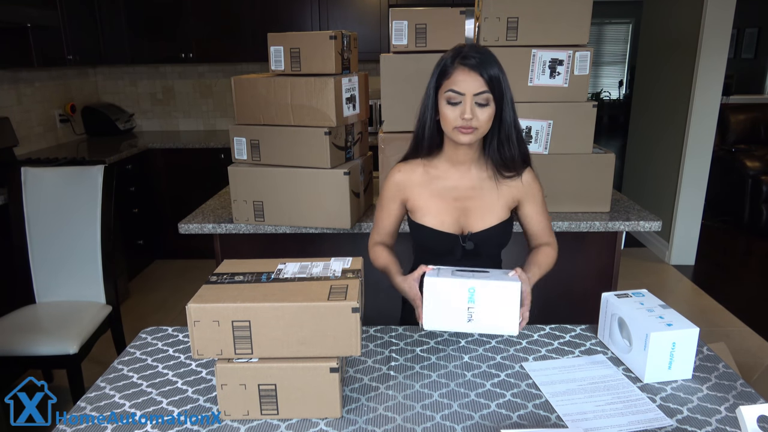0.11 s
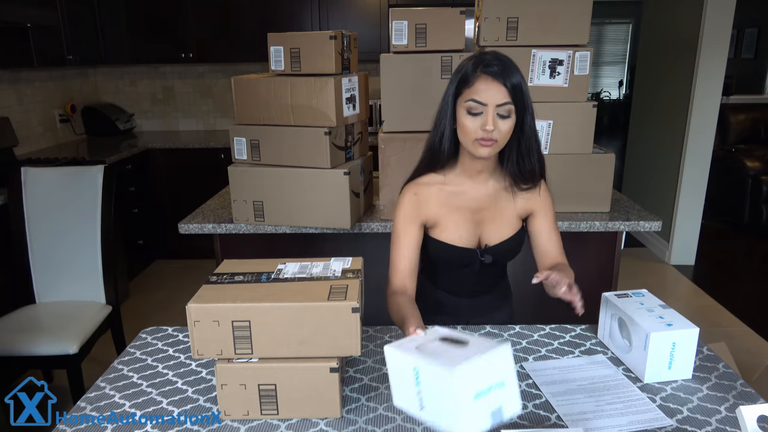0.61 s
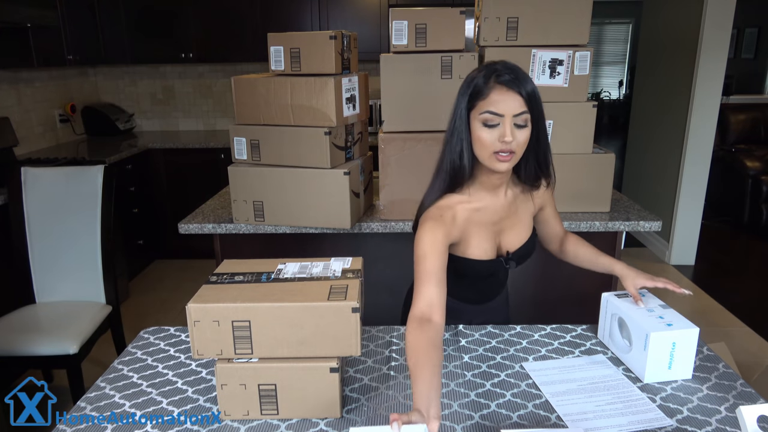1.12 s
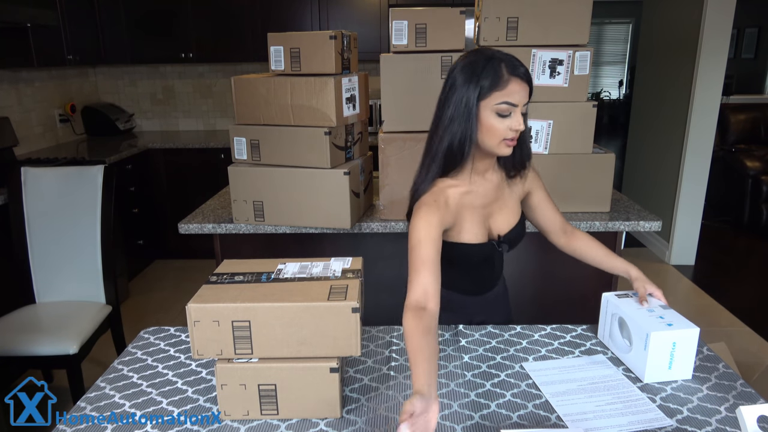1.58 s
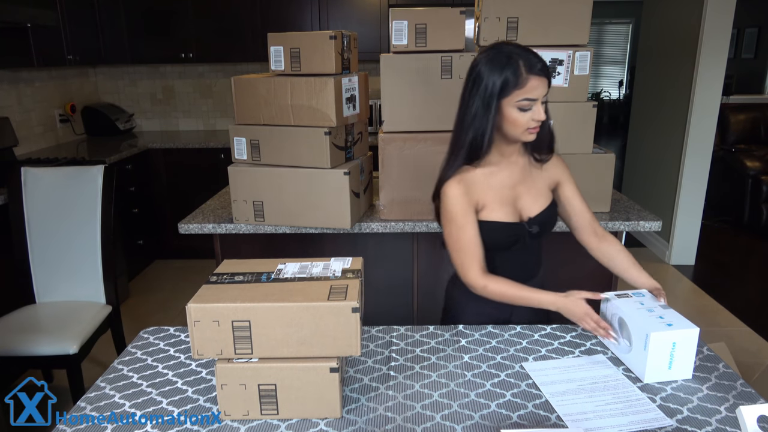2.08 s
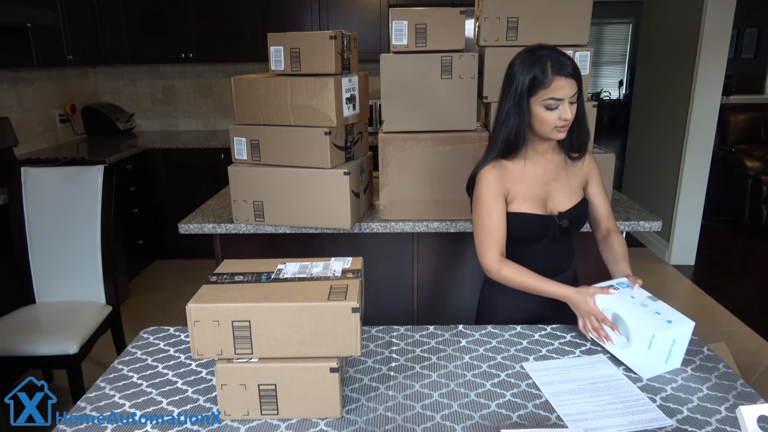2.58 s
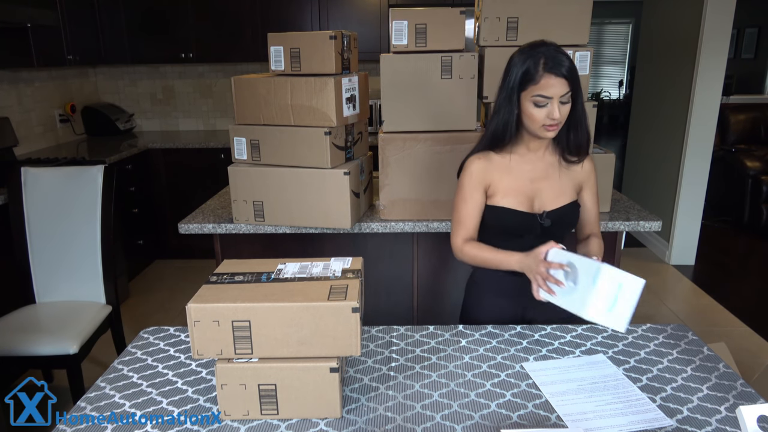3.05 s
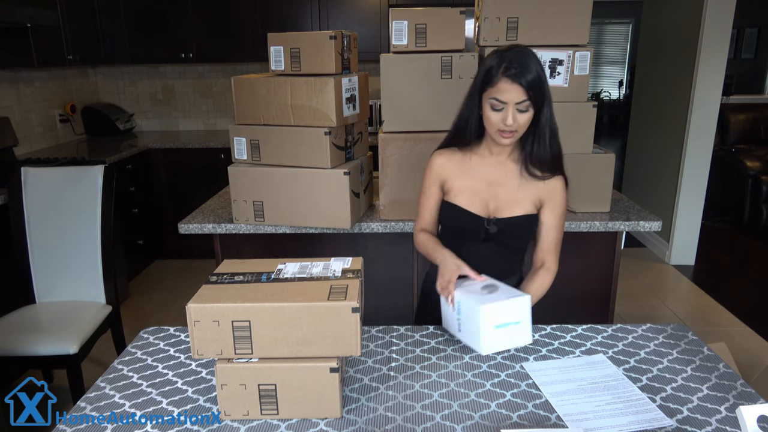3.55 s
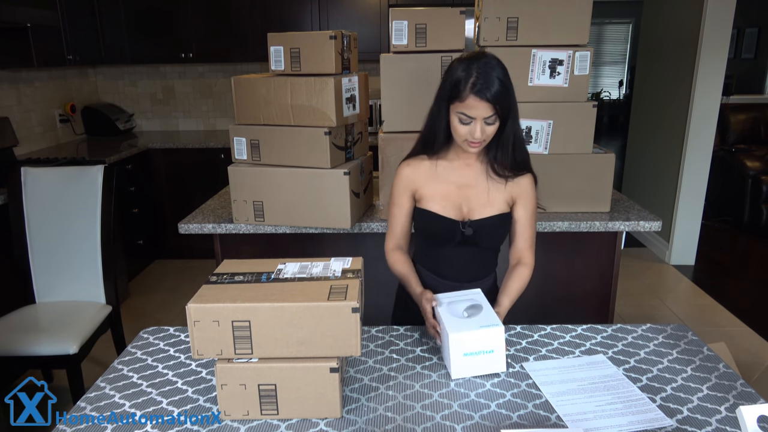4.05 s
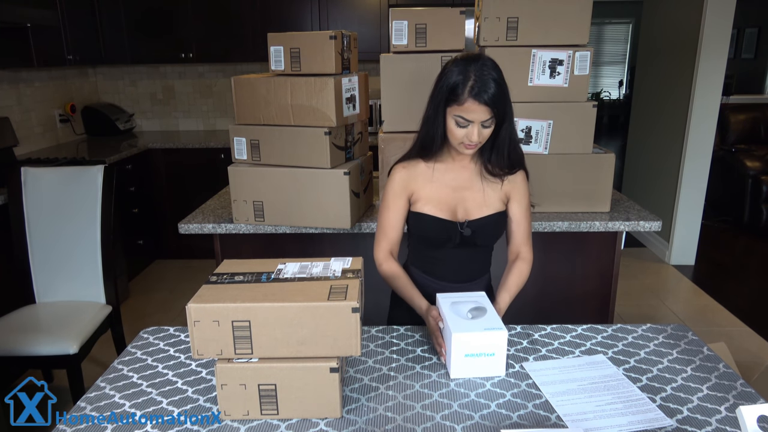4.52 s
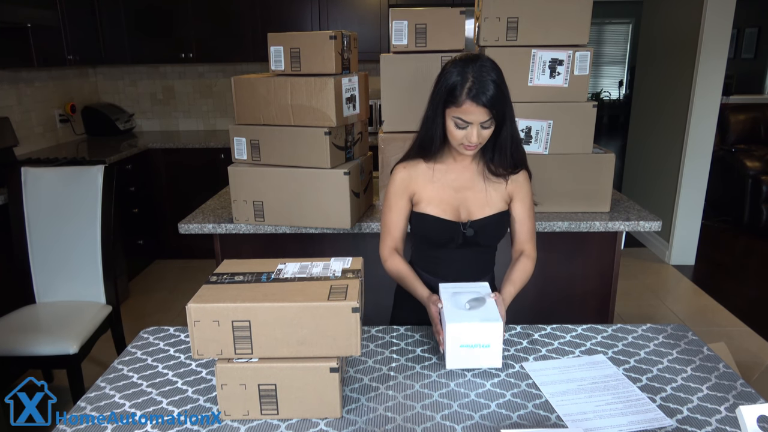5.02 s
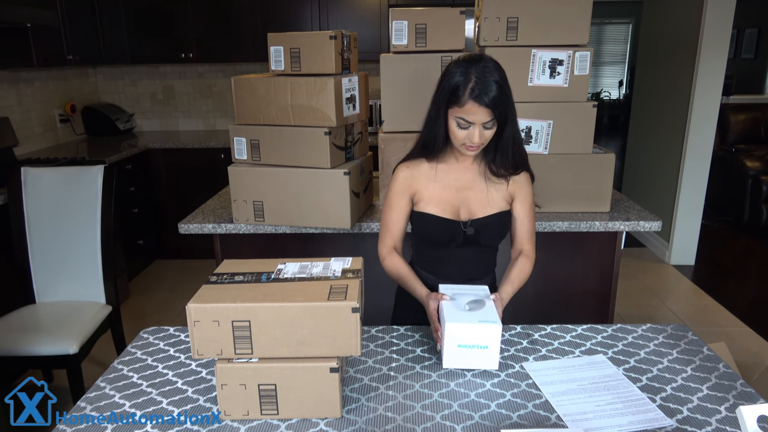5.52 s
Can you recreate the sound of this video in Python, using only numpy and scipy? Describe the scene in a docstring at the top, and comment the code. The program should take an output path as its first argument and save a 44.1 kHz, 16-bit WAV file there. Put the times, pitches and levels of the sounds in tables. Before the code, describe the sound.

Small cardboard boxes are slid, turned and set down on a cloth-covered table with hollow thumps, light ticks and soft rubbing in a furnished room.

```python
"""A brief rub and a low thump open a run of small cardboard boxes slid, turned and set down on a clothed table.
Landings are damped modes of table top, box and card walls, struck by a push and a rattle, with a swing of air.
Edges and nails tick as noise bursts, a small hard thing rings as sines, fingers and cloth rub as random slips.
A furnished room answers with decaying noise; the sound is nearly mono, close to overload on the hardest blows."""
import sys
import numpy as np
from scipy import signal
from scipy.fft import rfft, irfft
from scipy.io import wavfile

SR = 44100
rng = np.random.default_rng(int(sys.argv[2]) if len(sys.argv) > 2 else 0)


def pcm_store(signal):
    """Save signal as 16-bit PCM."""
    levels = np.round(np.clip(np.atleast_2d(signal), -1, 1) * 32767)
    wavfile.write(sys.argv[1], SR, levels.astype(np.int16).T)


def nominal_scale(level):
    """Amplitude ratio for a level in decibels (scalar or array-like)."""
    x = np.asarray(level, float) / 20
    return 10 ** x


N = 248283

# box landings and knocks; levels are relative within each layer:
# [t/s, air thump and box level/dB, table-top level/dB, card-wall level/dB, pitch f/Hz]
KNOCKS = [(0.003, -20, -26, -40, 79.5), (0.012, -22.5, -37, -24, 198), (0.142, -28, -39, -26.5, 82),
          (0.341, -39, -64, -30.5, 390), (0.371, -35, -54, -36, 457), (0.38, -22.5, -56, -42, 352),
          (0.384, -25.5, -57, -56, 455), (0.399, -37, -55, -37, 310), (0.4152, -19, -57, -30.5, 540),
          (0.419, -33.5, -54, -47, 540), (0.427, -48, -44, -37.5, 404), (0.709, -35, -45.5, -36.5, 325),
          (1.071, -9.5, -9.5, -28, 260), (1.179, -23.5, -37, -54, 133), (1.261, -29.5, -33, -34.5, 266),
          (1.324, -5.5, -9.5, -25, 256), (1.59, -6.5, -29, -14, 123), (1.594, -9, -32, -17.5, 350),
          (1.612, -4.5, -12, -24.5, 287), (1.801, -56, -33, -40, 41.4), (2.106, -31.5, -50, -43, 540),
          (2.239, -19, -56, -39, 176), (2.26, -33, -54, -66, 225), (2.412, -38, -62, -70, 163),
          (2.675, -22.5, -60, -29.5, 301), (2.845, -36, -62, -34.5, 430), (2.921, -21, -53, -54, 263),
          (2.964, -42, -55, -58, 303), (3.107, -39, -40, -37, 272), (3.114, -30.5, -40, -49, 276),
          (3.134, -39, -58.5, -37, 208), (3.259, -35.5, -40, -33.5, 420), (3.324, -34.5, -38, -39, 283),
          (3.511, -43.5, -39, -35.5, 78.6), (3.612, -47, -50, -48, 517), (3.728, -3.5, -10, -22.5, 169),
          (3.834, -4.5, -26, -8, 227), (3.864, -9, -14, -12, 460), (3.889, -10, -34, -14.5, 297),
          (4.1706, -2.5, -6.5, -17.5, 168), (4.423, -38.5, -35, -69, 41), (4.633, -48, -48, -57, 104),
          (4.687, -44, -41, -47, 270), (4.797, -53, -64, -44, 74.6), (4.844, -42.5, -42, -37, 340),
          (4.992, -38.5, -50, -43, 293), (5.075, -30.5, -67, -60, 180), (5.317, -55, -51, -40, 78),
          (5.457, -38, -56, -35, 227), (5.485, -35, -49, -42, 290), (5.592, -40, -49.5, -48, 297),
          (5.615, -51, -42, -33.5, 75)]
# resonances of each body, ring times before any damping: [f/Hz, relative level/dB, t60/s]
TABLE_MODES = [(37.46, -9.5, 1), (45.1, -2.5, 0.45), (75, -3, 0.15), (140, -7.5, 0.32)]
BOX_MODES = [(174.3, -6.5, 0.12), (199, 5, 0.063), (231.4, -0.5, 0.099), (277, 4.5, 0.41), (312, 5, 0.09),
             (350, 0, 0.14), (382, 18, 0.028), (448, -5.5, 0.097), (482, -1.5, 0.14), (540, -3.5, 0.12)]
WALL_MODES = [(562, -1, 0.051), (644, 2, 0.027), (678, -2, 0.065), (762, -2, 0.04), (813, 1, 0.023),
              (975, 3.5, 0.016), (1137, 8.5, 0.0098), (1212, 2.5, 0.013), (1419, -10.5, 0.025),
              (1580, -8, 0.0065), (1960, -27.5, 0.0092), (2340, -20.5, 0.0062), (2900, -29, 0.0074)]


def rms_one(x):
    """Scale to unit rms."""
    return x / np.sqrt(np.mean(x ** 2) + 1e-20)


def at_hz(points, hz):
    """Read a table on a log-frequency axis."""
    table_hz, values = np.transpose(points)
    return np.interp(np.log(hz), np.log(table_hz), values)


def in_time(rows):
    """Join the curve rows by straight lines."""
    s, *columns = np.transpose(rows)
    return [np.interp(np.arange(N) / SR, s, c) for c in columns]


def band(x, low_hz, high_hz):
    """Band-pass."""
    return signal.sosfilt(signal.butter(2, [low_hz, high_hz], "band", fs=SR, output="sos"), x)


def ring(x, hz, t60):
    """A two-pole resonator: a unit click sets a dying sine of starting height 1 ringing."""
    r = nominal_scale(-60 / (max(t60, .002) * SR))
    w = 2 * np.pi * hz / SR
    return signal.lfilter([0, np.sin(w)], [1, -2 * r * np.cos(w), r * r], x + 1e-18)


def drift(rate):
    """Slow wander: random points of spread 1, rate of them per second, joined by straight lines."""
    steps = rng.standard_normal(int(N / SR * 400))
    return np.interp(np.arange(N) / SR * rate, np.arange(len(steps)), steps)


def coloured(x, spectrum):
    """Shape a noise by a spectrum; rms 1."""
    hz = np.maximum(np.arange(N // 2 + 1) * SR / N, 1)
    return rms_one(irfft(rfft(x) * nominal_scale(at_hz(spectrum, hz)), N))


def room_tone():
    """The steady bed of the room: noise shaped by a fixed spectrum."""
    # colour of the bed: [f/Hz, relative level/dB]
    tone_spectrum = [(15, -23), (25, -6.5), (49, 11), (167, -24.5), (271, -8), (543, -20), (673, -1.5),
                     (952, -26.5), (6900, -28.5), (12100, -30.5), (15000, -59)]
    return nominal_scale(-60.5) * coloured(rng.standard_normal(N), tone_spectrum)


def grains(per_s, spread_db):
    """Fibres catch and let go: random slips of uneven size."""
    sizes = nominal_scale(spread_db * np.minimum(rng.exponential(size=N), 3.5)) * rng.standard_normal(N)
    return sizes * (rng.random(N) < per_s / SR)


def strokes():
    """Each stroke of skin or cloth along the card swells and fades; gains of hiss, air and scrape."""
    # [start t/s, length/s, fine hiss level/dB, top air level/dB, scrape in the card level/dB]
    stroke_rows = [(0.0, 0.058, -52.5, -63, -75), (0.11, 0.063, -81, -82, -41.5),
                   (0.362, 0.061, -44, -67.5, -39.5), (1.129, 0.15, -88, -89, -57),
                   (1.77, 0.27, -57.5, -72, -78), (2.294, 0.12, -79, -87.5, -50.5),
                   (2.485, 0.13, -69, -80, -41), (2.549, 0.11, -94, -73, -70), (2.679, 0.12, -90, -69, -56),
                   (3.191, 0.25, -54.5, -61, -53), (3.586, 0.079, -61, -64, -45),
                   (3.645, 0.35, -56, -60.5, -43), (3.82, 0.17, -56, -74, -27),
                   (3.877, 0.14, -58, -71, -50), (3.928, 0.24, -55, -81, -38),
                   (4.081, 0.19, -54, -66.5, -56.5), (4.177, 0.15, -66, -74.5, -71),
                   (4.204, 0.19, -55.5, -71, -77), (4.342, 0.26, -59.5, -69, -80),
                   (4.799, 0.093, -81, -69.5, -88), (4.909, 0.14, -59, -69, -61.5),
                   (5.045, 0.13, -57, -67.5, -54.5), (5.208, 0.12, -59, -76, -72),
                   (5.436, 0.14, -53.5, -61.5, -73), (5.571, 0.084, -56, -67, -60)]
    rise_share, edge_drop_db = 0.27, 27.5   # share of the length spent swelling; drop at both ends
    t, gains = np.arange(N) / SR, np.zeros((3, N))
    for s, length, *levels_db in stroke_rows:
        top = s + rise_share * length
        away = np.where(t < top, (top - t) / (top - s), (t - top) / (s + length - top))
        swell = nominal_scale(-edge_drop_db * np.minimum(away, 4) ** 2)
        gains += nominal_scale(np.array(levels_db))[:, None] * swell
    return gains


def shaking(column, offset_db, top_s):
    """Gain of the loose shaking that swells for top_s and dies after every blow."""
    blows = np.zeros(N)
    for row in KNOCKS:
        blows[round(row[0] * SR)] = nominal_scale(row[column] + offset_db)
    r = np.exp(-1 / (top_s * SR))
    return signal.lfilter([np.e * (1 - r)], [1, -2 * r, r * r], blows + 1e-18)


def rubbed(slips, modes, t60_share):
    """Slips keep a body's modes sounding, their ring times cut to a share by the touch; rms 1."""
    return rms_one(sum(nominal_scale(db) * ring(slips, hz, t60_share * t60) for hz, db, t60 in modes))


def rubbing():
    """Dense slips of skin and cloth on card: heard as hiss, and through the walls, the box and the table."""
    # hands moving about the box between strokes:
    # [t/s, rustle level/dB, rumble in the box level/dB, sway of the table level/dB]
    handling = [(0, -56, -25, -54), (.06, -56, -44, -75), (.25, -59, -39.5, -62), (.5, -62, -64, -56),
                (.7, -77.5, -54, -60.5), (.9, -63, -54, -52), (1.3, -59.5, -63, -63),
                (1.7, -62.5, -37.5, -30), (2.08, -66, -60.5, -57), (2.17, -63, -51, -50),
                (2.3, -58.5, -50, -55), (2.6, -57.5, -49, -58), (3.02, -68, -77, -63),
                (3.14, -63, -53, -43.5), (3.55, -62, -53.5, -78), (3.78, -57, -42, -49),
                (3.89, -58.5, -27, -34), (4.05, -59, -48.5, -45.5), (4.27, -70.5, -30.5, -37.5),
                (4.4, -59, -48.5, -45), (4.55, -61.5, -55, -64), (4.75, -67, -54.5, -50.5),
                (5.4, -73.5, -56.5, -53), (5.63, -77, -53.5, -62)]
    # shaking left by a blow, rows for walls, box and table: [level against the blow/dB, time to top of swell/s]
    shake_rules = [(-44, 0.055), (-27, 0.022), (-29, 0.038)]
    # colour of the fine hiss: [f/Hz, relative level per Hz/dB]
    hiss_spectrum = [(1180, -13), (2000, 5), (2550, 2.5), (2790, 4), (4490, 1.5), (5670, -3.5), (7320, -4),
                     (8300, -19.5), (10800, -82.5), (18300, -120)]
    # the box drags over the weave of the cloth: [t/s, level/dB]
    weave_curve = [(0, -78), (.5, -90), (.9, -94.5), (1.7, -84), (2.15, -79), (2.3, -61), (2.48, -60),
                   (2.62, -85), (3.0, -85), (3.8, -77), (5.63, -87)]

    rustle_db, box_db, sway_db = in_time(handling)
    rustle_gains = nominal_scale(rustle_db + [[0], [-18], [4]])   # hiss, air and card against the rustle
    hiss_gain, air_gain, card_gain = strokes() + rustle_gains
    wall_shake, box_shake, table_shake = [shaking(column, *rule)
                                          for column, rule in zip((3, 1, 2), shake_rules)]

    fine = grains(6000, 0.56) * nominal_scale(2.0 * drift(53))
    dense = grains(4000, 1.7)
    coarse = dense * nominal_scale(3 * drift(40))
    shudder = dense * nominal_scale(1.5 * drift(15))   # heavy bodies even out the slips

    hiss = coloured(fine, hiss_spectrum)
    air = rms_one(band(fine, 4000, 14800))
    card = rubbed(coarse, WALL_MODES, 0.5) + 0.41 * rms_one(band(coarse, 280, 1600))
    card = rms_one(band(card, 587, 2130))   # a light scrape does not move the whole box
    box = rubbed(shudder, BOX_MODES, 0.25)
    sway = rubbed(shudder, TABLE_MODES, 0.22)
    weave = rms_one(band(coarse, 4300, 5600))   # the weave sings in a narrow bright band

    out = nominal_scale(in_time(weave_curve)[0]) * weave
    out = out + hiss_gain * hiss + air_gain * air
    out = out + (card_gain + wall_shake) * card
    out = out + (nominal_scale(box_db) + box_shake) * box
    return out + (nominal_scale(sway_db) + table_shake) * sway


def thumps(offset_db, fade_cycles):
    """The first push of air: a dip, a big swing and a rebound at the pitch of the knock."""
    out, t = np.zeros(N + SR), np.arange(SR // 8) / SR
    for s, thump_db, _, _, hz in KNOCKS:
        rise = 1 - np.exp(-(t * hz / .8) ** 2)   # sets in over about .8 of a cycle
        fade = np.exp(-t * hz / fade_cycles)
        at = round(s * SR)
        out[at:at + len(t)] -= nominal_scale(thump_db + offset_db) * np.sin(2 * np.pi * hz * t) * rise * fade
    return out[:N]


def struck(modes, column, offset_db, vary_db, contact_hz, rattle_db, focus_db, flex, longest_s, mode_factor=1):
    """A blunt push and a dying rattle drive the modes; the grip shifts and damps them blow by blow.

    column: level column of KNOCKS; vary_db: spread of each mode's level; flex: spread of its pitch, as a share;
    focus_db: loss per octave away from the knock's pitch; mode_factor: gain from each mode to the next."""
    grip_damps = .16   # light knocks come with the box in hand: dB of ring time per dB of blow
    full_rattle_s, rattle_grows = 0.041, 0.71   # after a 0 dB blow; dB of length per dB of blow
    out, t = np.zeros(N + 2 * SR), np.arange(SR // 4) / SR
    rattles = rng.standard_normal((len(KNOCKS), len(t)))
    luck = rng.standard_normal((len(KNOCKS), len(modes), 2))
    soft_contact = signal.butter(2, contact_hz, fs=SR)
    for k, row in enumerate(KNOCKS):
        blow_db = max(row[1:4])
        rattle_s = full_rattle_s * nominal_scale(rattle_grows * blow_db)   # harder blows rattle longer
        push = nominal_scale(rattle_db) * rattles[k] * np.exp(-t / rattle_s) / np.sqrt(SR / 100)
        push[0] = 1
        push = signal.lfilter(*soft_contact, push)
        at = round(row[0] * SR)
        for m, (hz, mode_db, t60) in enumerate(modes):
            t60 = min(t60, longest_s) * nominal_scale(grip_damps * blow_db)
            force = np.concatenate([push, np.zeros(int(t60 * SR))])
            off_pitch_db = -focus_db * abs(np.log2(hz / row[4]))
            level_db = row[column] + mode_db + offset_db + off_pitch_db + vary_db * luck[k, m, 0]
            bent_hz = hz * (1 + flex * luck[k, m, 1])
            out[at:at + len(force)] += mode_factor ** m * nominal_scale(level_db) * ring(force, bent_hz, t60)
    return out[:N]


def knocks():
    """The table top booms, the air in the box thumps, its card walls rap."""
    card = dict(flex=.04, longest_s=.2)   # card bends, and is damped
    table = struck(TABLE_MODES, column=2, offset_db=7.0, vary_db=0.5, contact_hz=114.5, rattle_db=-17.0,
                   focus_db=8.0, flex=0, longest_s=1)
    box = struck(BOX_MODES, column=1, offset_db=-23.0, vary_db=4.0, contact_hz=450, rattle_db=1.5,
                 focus_db=6.0, **card)
    # neighbouring wall modes swing against each other, each a little stronger than the last
    walls = struck(WALL_MODES, column=3, offset_db=-1.0, vary_db=1.5, contact_hz=1295, rattle_db=0.5,
                   focus_db=0.0, mode_factor=-1.094, **card)
    settle = round(.002 * SR)   # the bodies answer once the full weight has landed
    bodies = np.concatenate([np.zeros(settle), (box + walls)[:-settle]])
    return thumps(offset_db=15.5, fade_cycles=0.73) - table - bodies


def ticks():
    """A snap is one sharp click and a dying crackle, heard around its own pitch and as bright fizz."""
    # ticks of edges and nails: [t/s, peak level/dB, pitch f/Hz, t60/s, relative fizz level/dB]
    tick_rows = [(0.297, -31.5, 1320, 0.062, -63), (0.3393, -34, 1600, 0.056, -60),
                 (0.3709, -17.5, 1300, 0.042, -58.5), (0.38, -31, 1700, 0.022, -56),
                 (0.4, -18.5, 1320, 0.042, -58), (0.4169, -27.5, 1590, 0.02, -66),
                 (0.44, -50, 1480, 0.012, -40), (0.7165, -33.5, 1410, 0.033, -60),
                 (0.7518, -39.5, 1430, 0.018, -36.5), (0.813, -17, 3230, 0.07, -12),
                 (0.8263, -21, 2760, 0.057, -19.5), (0.8613, -39, 3130, 0.012, -52),
                 (0.881, -47, 2100, 0.015, -54), (1.026, -40, 2270, 0.2, -70),
                 (1.071, -38, 1304, 0.17, -77), (1.162, -46.5, 4240, 0.0078, -52.5),
                 (1.181, -37, 2220, 0.017, -59), (1.327, -26, 1540, 0.16, -70),
                 (1.365, -35, 1660, 0.025, -78), (1.5749, -24.5, 1500, 0.049, -34),
                 (1.592, -23, 1510, 0.18, -67), (2.1072, -26.5, 1780, 0.015, -28.5),
                 (2.1933, -28.5, 1290, 0.065, -56), (2.224, -39, 4200, 0.0084, -68),
                 (2.508, -35, 1290, 0.11, -70), (2.519, -34, 1260, 0.07, -70), (2.588, -41, 1300, .02, -65),
                 (2.6762, -16.5, 1390, 0.022, -61), (2.925, -37.5, 1000, 0.022, -65),
                 (3.05, -47, 1530, 0.031, -69), (3.1076, -32.5, 1700, 0.024, -64),
                 (3.1336, -39, 1200, 0.025, -68), (3.2346, -37, 1560, 0.029, -58),
                 (3.325, -34, 1390, 0.024, -53), (3.6096, -34, 1390, 0.028, -59),
                 (3.7322, -14.5, 1420, 0.022, -41), (3.744, -21, 1190, 0.06, -62),
                 (3.835, -6, 890, 0.037, -25), (3.878, -29, 2300, 0.012, -58),
                 (3.918, -35, 1350, 0.025, -42), (3.959, -28, 2800, 0.018, -55),
                 (4.116, -30, 1500, 0.039, -63.5), (4.1739, -16, 1200, 0.017, -68),
                 (4.4787, -35.5, 2840, 0.027, -41), (4.803, -44.5, 1810, 0.052, -42),
                 (5.062, -40.5, 1600, 0.022, -43.5), (5.319, -42.5, 1520, 0.04, -45.5),
                 (5.5428, -41, 1480, 0.068, -44)]
    reach = 2 ** (1.2 / 2)   # the pitched band spans 1.2 octaves
    out, t = np.zeros(N + SR), np.arange(SR // 4) / SR
    noise = rng.standard_normal((len(tick_rows), len(t)))
    for (s, peak_db, hz, t60, fizz_db), white in zip(tick_rows, noise):
        snap = white * nominal_scale(-60 * t / t60)
        snap[0] = 12.1
        rough = band(snap, hz / reach, hz * reach)
        fizz = band(snap, 4200, 7800) + nominal_scale(-5.0) * band(snap, 9000, 15000)
        at = round(s * SR)
        out[at:at + len(t)] += nominal_scale(peak_db) * rough / np.abs(rough).max() + nominal_scale(fizz_db - 5.0) * fizz
    return out[:N]


def rings():
    """Something small and hard rings after a snap: thin tones that waver as they die."""
    # [t/s, f/Hz, level before the wavering/dB, t60/s]
    ring_rows = [(0.861, 1600, -23, .02), (0.872, 1600, -42, .06), (0.882, 2132, -64, 1.5)]
    out = 0
    for s, hz, level_db, t60 in ring_rows:
        click = np.zeros(N)
        click[round(s * SR)] = nominal_scale(level_db)
        out = out + ring(click, hz, t60)
    return out * nominal_scale(6 * drift(90))


def microphone(x, top_db):
    """The capsule loses the deepest bass and steps down steeply above its corner."""
    corner_hz = 7700
    x = signal.sosfilt(signal.butter(4, 30, "high", fs=SR, output="sos"), x)
    below = signal.sosfilt(signal.butter(8, corner_hz, fs=SR, output="sos"), x)
    above = signal.sosfilt(signal.butter(8, corner_hz, "high", fs=SR, output="sos"), x)
    return below + nominal_scale(top_db) * above


def room(x):
    """Diffuse reflections: noise that swells in over a few ms and dies band by band; two unrelated draws."""
    # reverberation time: [f/Hz, t60/s]
    room_t60 = [(60, 0.46), (200, 0.36), (600, 0.35), (1500, 0.23), (4000, 0.39), (10000, 0.26)]
    t, edges = np.arange(SR // 2) / SR, 40 * 2.0 ** np.arange(9)   # octave bands
    white, tail = rng.standard_normal((2, len(t))), 0
    for low, high in zip(edges, edges[1:]):
        tail = tail + band(white, low, high) * nominal_scale(-60 * t / at_hz(room_t60, np.sqrt(low * high)))
    tail = signal.lfilter(*signal.butter(1, 2800, fs=SR), tail)   # soft furniture swallows the treble
    tail = tail * (1 - np.exp(-(t / 0.0013) ** 2))
    tail = tail / np.sqrt(np.sum(tail ** 2, axis=1, keepdims=True))   # unit energy
    return signal.fftconvolve(x[None], tail, axes=1)[:, :N]


def scene():
    """Blows reverberate; the sides differ by a little diffuse sound, faint treble hiss and 1 dB of balance."""
    steady = room_tone() + rubbing() + rings()
    blows = microphone(knocks() + ticks(), top_db=-25)
    wet, other = room(blows + 0.13 * steady)
    mid = blows + nominal_scale(-12) * wet + steady
    side_hiss = rms_one(band(rng.standard_normal(N), 5000, 12000))
    side = nominal_scale(-44.5) * (other + room(steady)[1]) + nominal_scale(-88) * side_hiss
    return np.array([mid + side, mid - side]) * nominal_scale([[-0.5], [0.5]])   # right a little louder


def low_pass(x):
    """Removes everything above the highest recorded frequency."""
    return signal.sosfilt(signal.butter(12, 15350, fs=SR, output="sos"), x)


def record(dry):
    """The hardest peaks are rounded off at full scale."""
    rounded = dry / (1 + np.abs(dry) ** 14) ** (1 / 14)
    return low_pass(rounded)


dry = scene()
out = record(dry)
pcm_store(out)
```